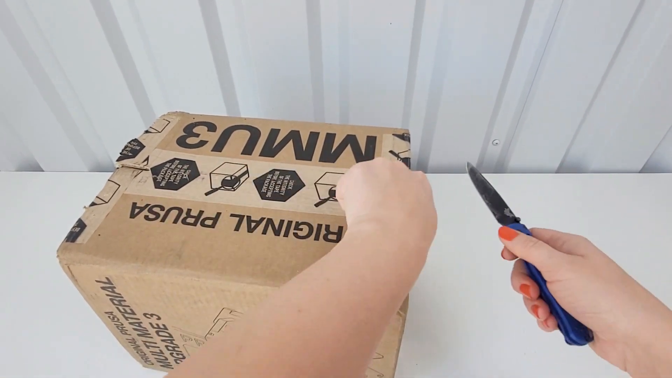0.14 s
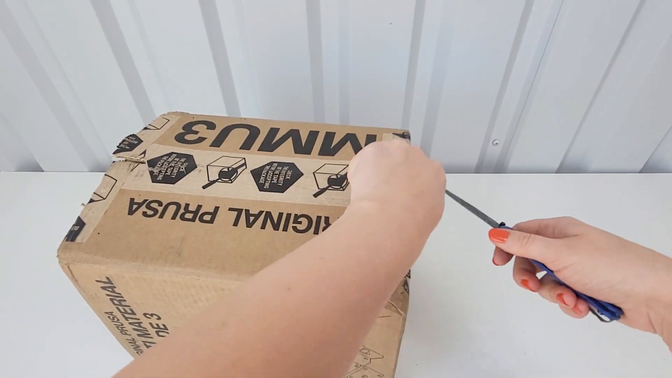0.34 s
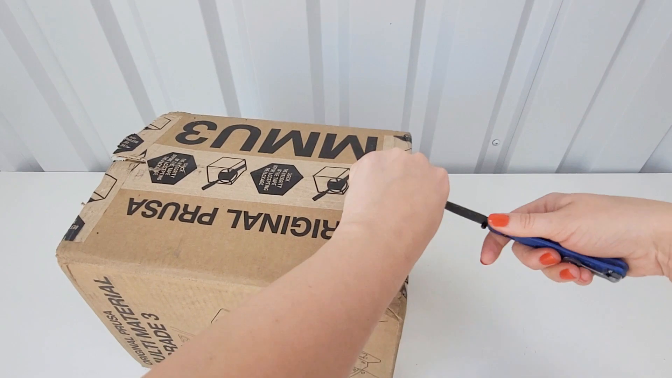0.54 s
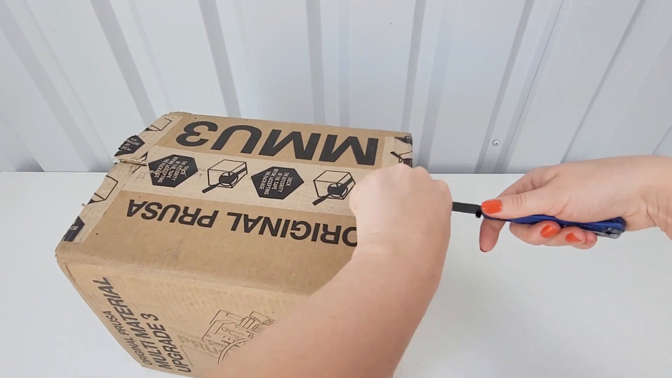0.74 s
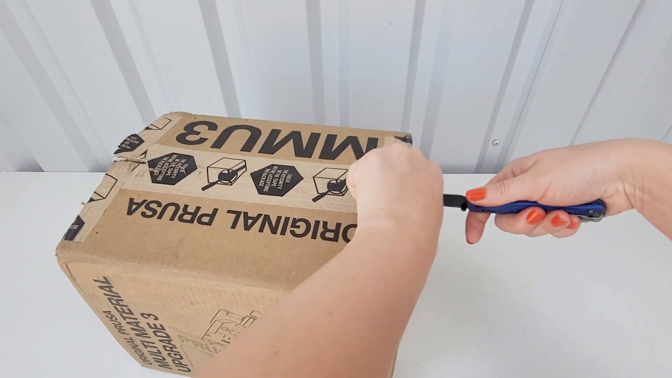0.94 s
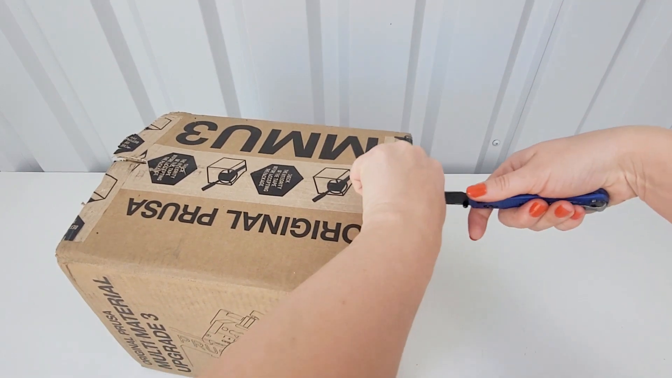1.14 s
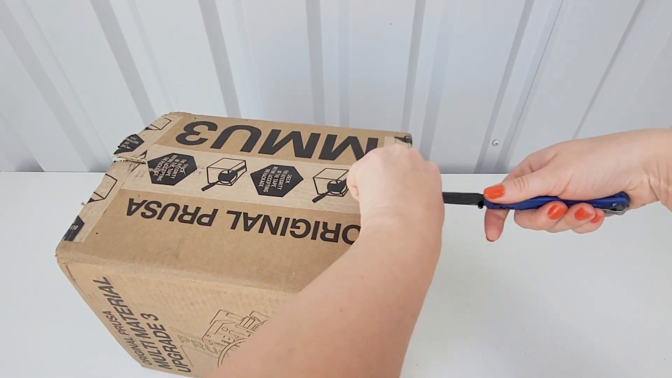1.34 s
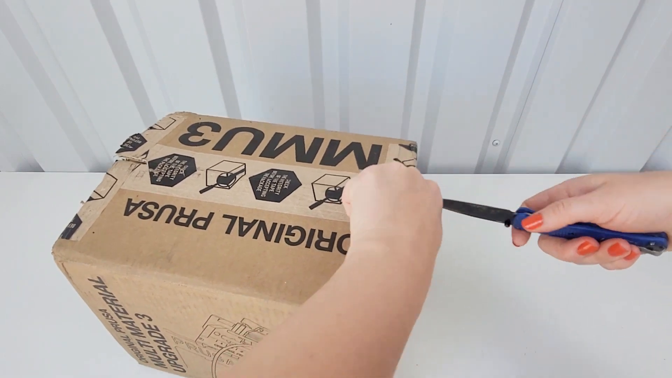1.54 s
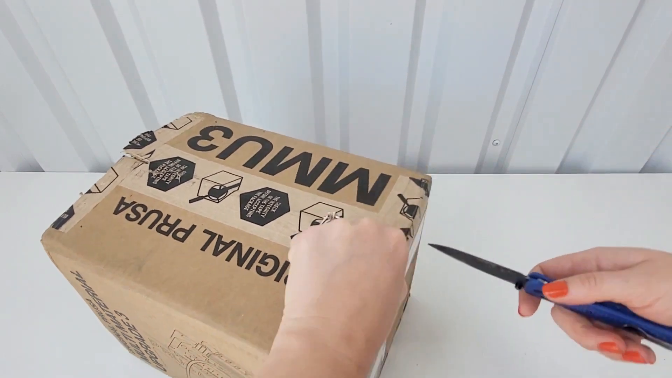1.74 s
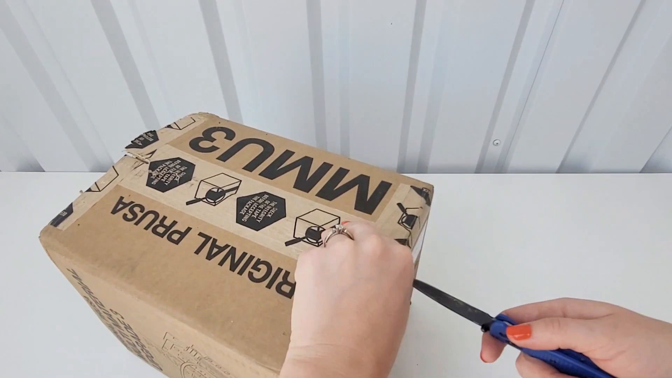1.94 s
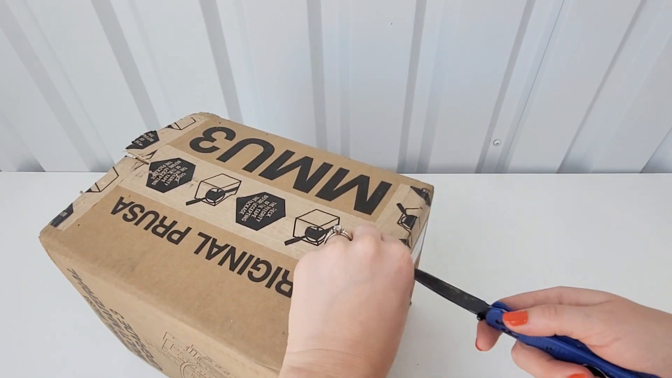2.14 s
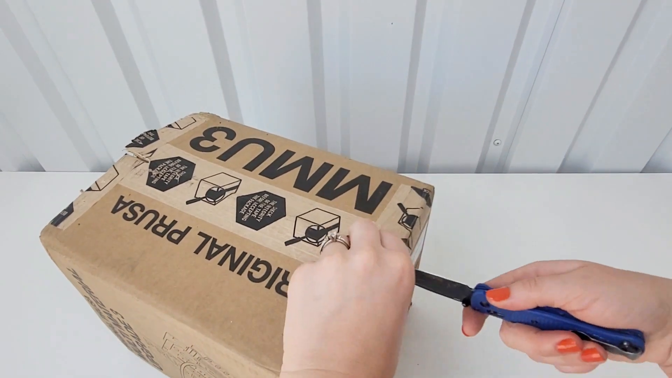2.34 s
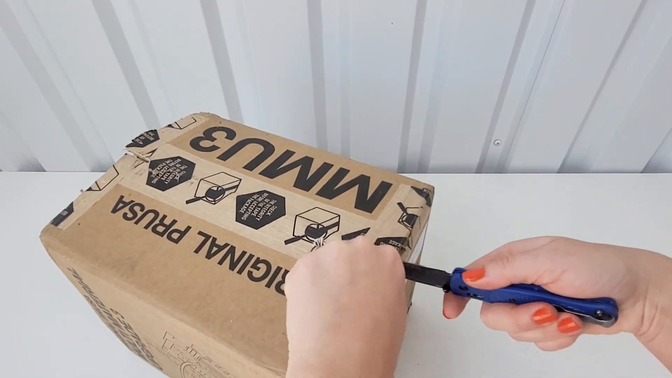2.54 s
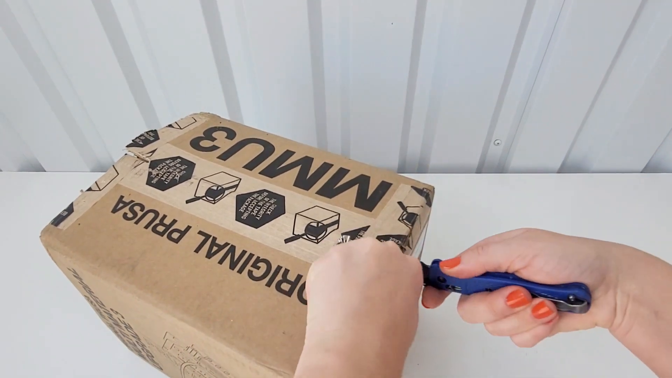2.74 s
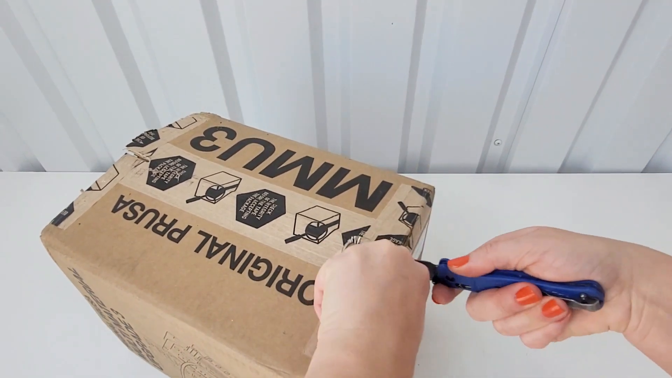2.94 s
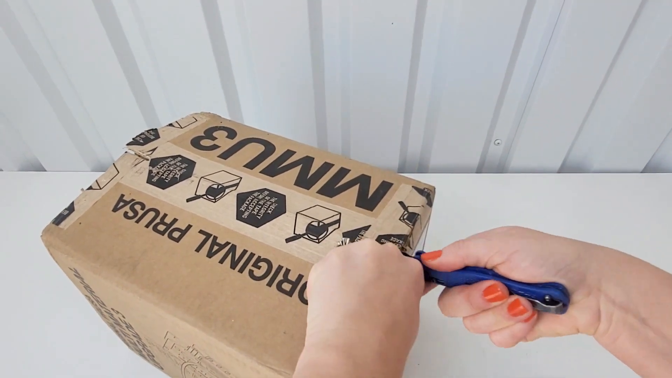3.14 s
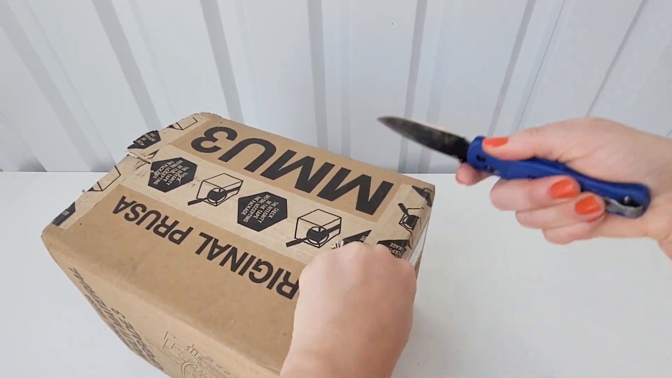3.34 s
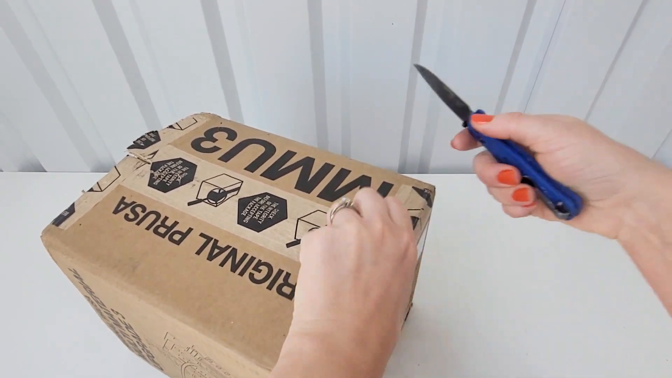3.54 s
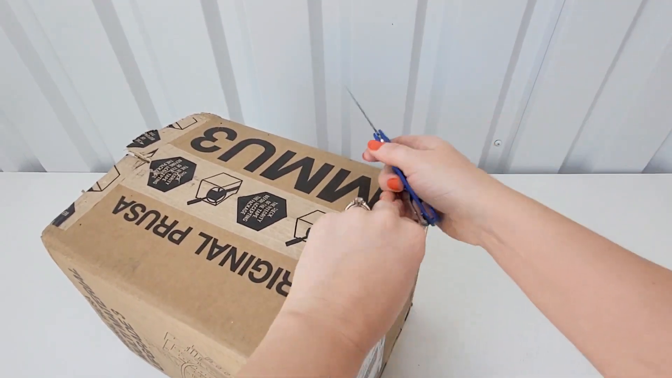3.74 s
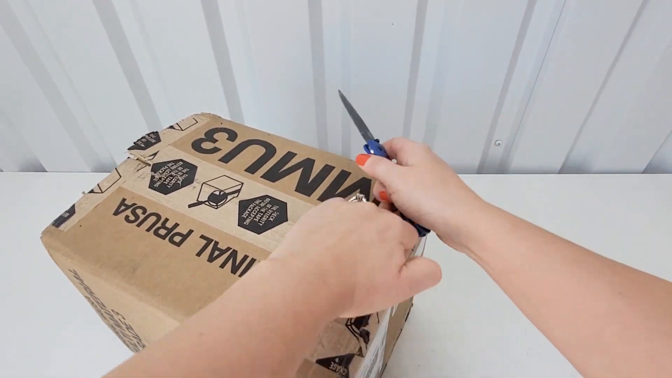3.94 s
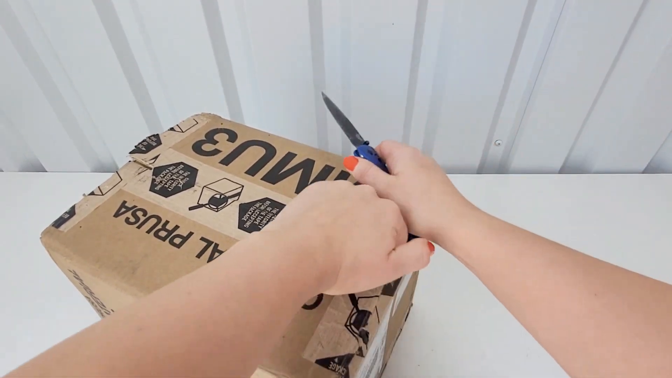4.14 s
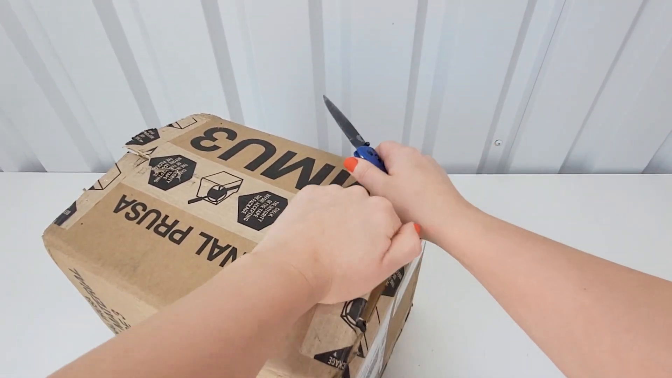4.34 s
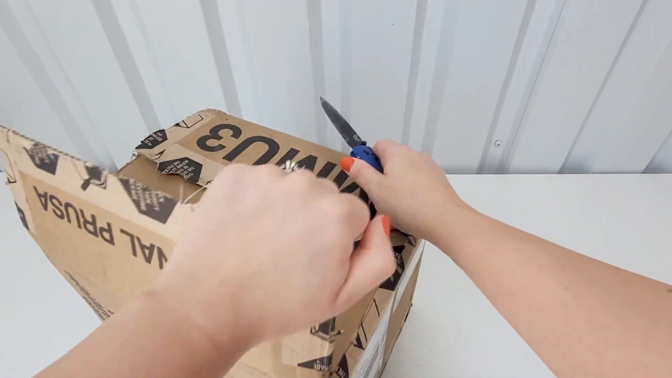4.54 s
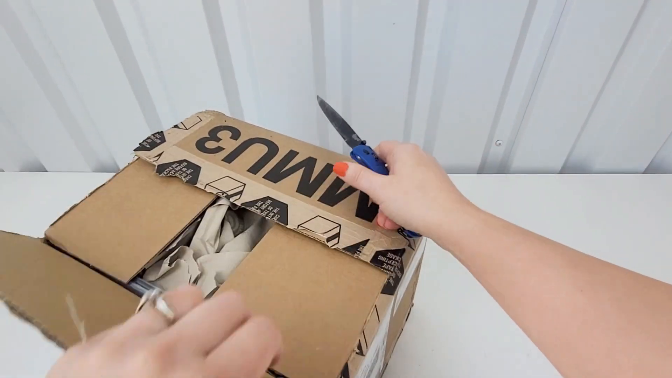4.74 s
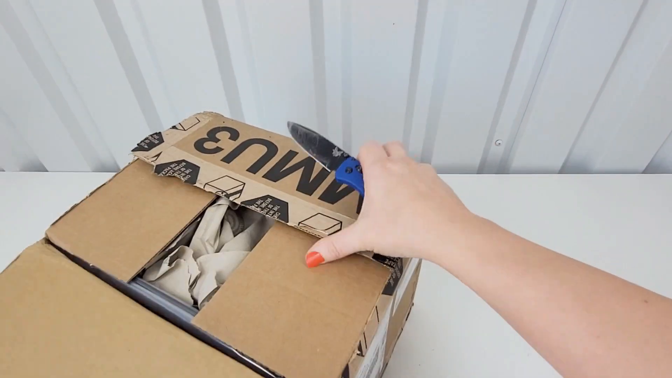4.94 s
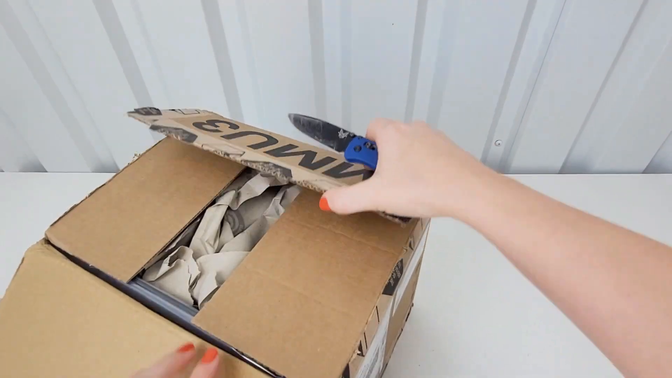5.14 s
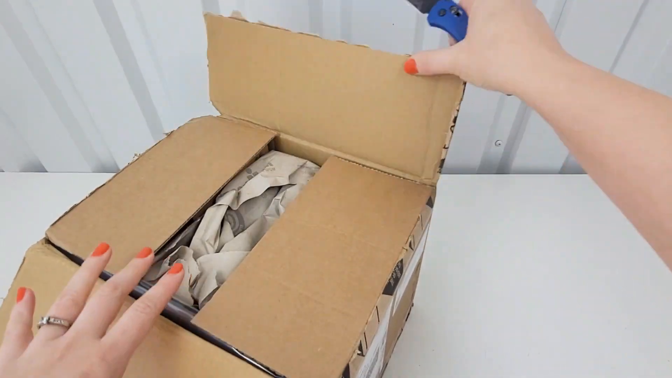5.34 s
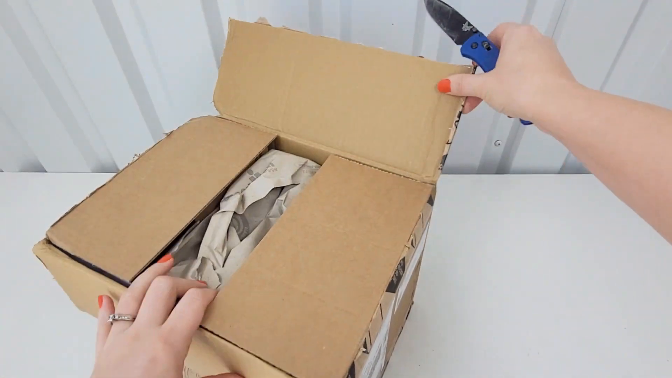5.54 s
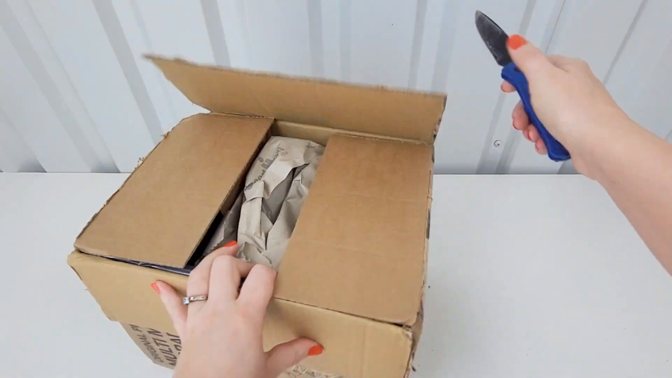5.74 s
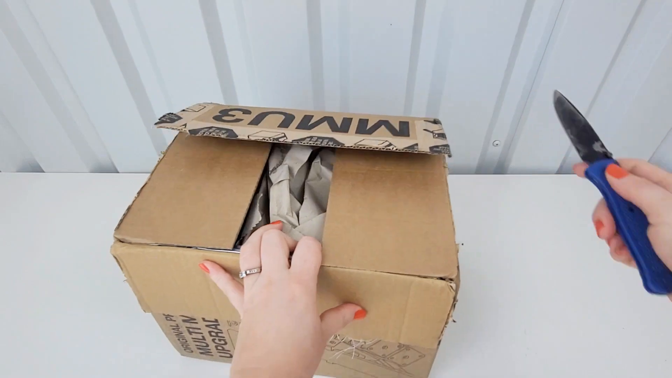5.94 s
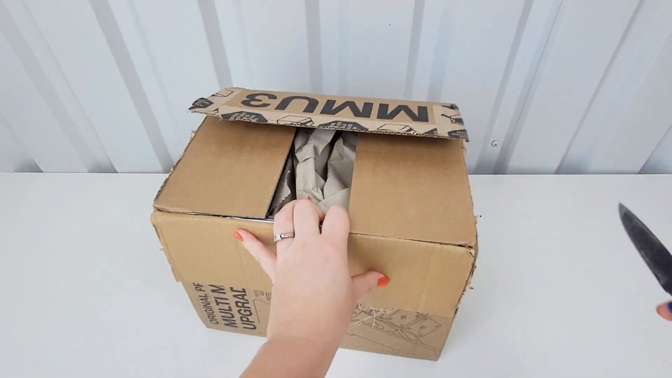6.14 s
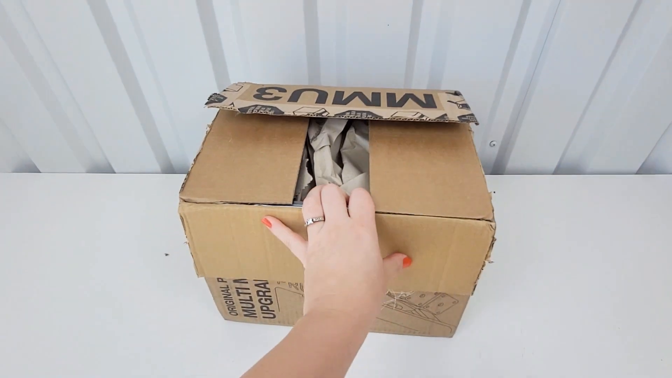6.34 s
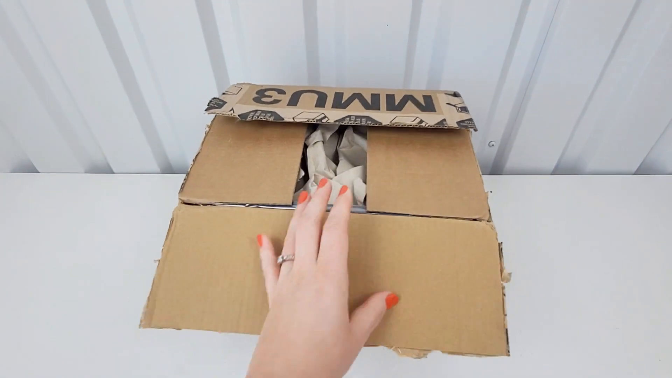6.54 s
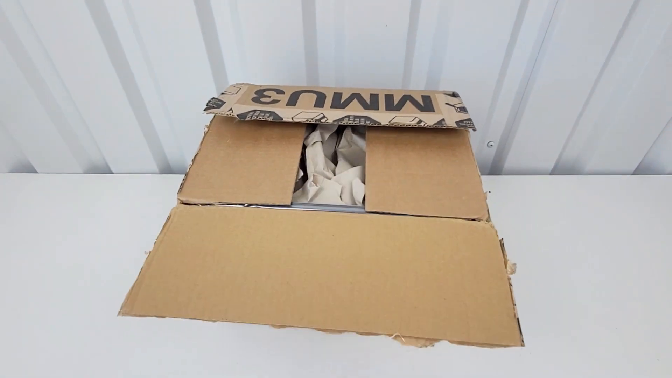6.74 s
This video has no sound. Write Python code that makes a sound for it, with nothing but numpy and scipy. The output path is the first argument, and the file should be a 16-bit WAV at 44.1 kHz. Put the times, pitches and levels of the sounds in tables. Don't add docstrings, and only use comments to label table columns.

```python
import sys
import numpy as np
from scipy import signal
from scipy.fft import rfft, irfft, next_fast_len
from scipy.io import wavfile

SR = 44100
rng = np.random.default_rng(int(sys.argv[2]) if len(sys.argv) > 2 else 0)


def volts_from_db(level):
    exponent = np.asarray(level, float) / 20
    return 10 ** exponent


def pcm_store(signal):
    levels = np.round(np.clip(np.atleast_2d(signal), -1, 1) * 32767)
    wavfile.write(sys.argv[1], SR, levels.astype(np.int16).T)


N = 303395


def rms_one(x):
    return x / np.sqrt(np.mean(x ** 2) + 1e-20)


def in_time(rows):
    t_s, *columns = np.transpose(rows)
    return [np.interp(np.arange(N) / SR, t_s, column) for column in columns]


def band(x, low_hz, high_hz):
    sos = signal.butter(2, [low_hz, min(high_hz, 0.45 * SR)], "band", fs=SR, output="sos")
    return signal.sosfilt(sos, x)


def high_pass(x, order, cut_hz):
    return signal.sosfilt(signal.butter(order, cut_hz, "high", fs=SR, output="sos"), x)


def coloured(x, spectrum, ripple_db=0):
    f_hz, level_db = np.transpose(spectrum)
    size = next_fast_len(N)
    grid_hz = np.fft.rfftfreq(size, 1 / SR) + 1
    ripple = np.interp(grid_hz, np.linspace(0, SR / 2, 160), rng.standard_normal(160))
    gain_db = np.interp(np.log(grid_hz), np.log(f_hz), level_db) + ripple_db * ripple
    return irfft(rfft(x, size) * volts_from_db(gain_db), size)[:N]


def drift(rate_hz):
    r = np.exp(-80 * np.pi * rate_hz / SR)
    slow = signal.lfilter([1], [1, -2 * r, r * r], rng.standard_normal(N // 40 + 2002))[2000:]
    return np.interp(np.arange(N) / 40, np.arange(len(slow)), rms_one(slow))


def ring(push, f_hz, t60_s):
    r = volts_from_db(-60 / (t60_s * SR))
    w = 2 * np.pi * f_hz / SR
    return signal.lfilter([0, np.sin(w)], [1, -2 * r * np.cos(w), r * r], push + 1e-18)


def add(out, t_s, piece):
    i = round(t_s * SR)
    out[i:i + len(piece)] += piece[:N - i]


def swell_db(t, peak_s, rise_s, fall_s, roundness):
    before = (peak_s - t) / max(rise_s, 0.005)
    after = (t - peak_s) / max(fall_s, 0.005)
    away = np.where(t < peak_s, before, after).clip(0)
    return (-20 * away ** roundness).clip(-100)


def resonant_friction(rows, width):
    out = np.zeros(N)
    for peak_s, level_db, rise_s, fall_s, f_hz in rows:
        t = np.arange(max(peak_s - 2 * rise_s, 0), peak_s + 2 * fall_s, 1 / SR)
        swell = volts_from_db(swell_db(t, peak_s, rise_s, fall_s, 1.3))
        heard = swell * band(rng.standard_normal(len(t)), f_hz / (1 + width), f_hz * (1 + width))
        add(out, t[0], volts_from_db(level_db) * np.sqrt(np.mean(swell ** 2)) * rms_one(heard))
    return out


def background():
    # f/Hz, level/dB rms
    motor = [(58.6, -53.5), (119.7, -64), (115.5, -60.5), (174, -57.5), (137.4, -70)]
    # f/Hz, level/dB per Hz
    air = [(30, -11.5), (80, -12.5), (200, -16.5), (260, -18), (500, -40.5), (900, -46), (1300, -56),
           (2500, -81), (4000, -60), (9000, -73), (14300, -66), (16500, -82)]
    # t/s, gain/dB
    duck = [(0, -1), (1.5, 0.8), (3, 1.3), (3.25, 0), (4.2, 0), (4.55, -7), (5.2, -7), (5.7, -3),
            (6.1, 0.5), (6.88, -2.5)]
    t = np.arange(N) / SR
    hum = np.zeros(N)
    for f_hz, level_db in motor:
        level = np.sqrt(2) * volts_from_db(level_db + 1.4 * drift(0.88))
        hum += level * np.sin(2 * np.pi * f_hz * t + 0.42 * drift(0.88))
    hiss = rms_one(coloured(rng.standard_normal(N), air) * volts_from_db(1.2 * drift(4.6)))
    return volts_from_db(in_time(duck)[0]) * (hum + volts_from_db(-61) * hiss)


def jolts():
    # t/s, peak/dB, f/Hz, t60/s
    jolt_rows = [
        (1.868, -44, 98, 0.13),
        (3.002, -36, 93, 0.099),
        (3.165, -15.5, 164, 0.095),
        (3.19, -31, 82.4, 0.17),
        (3.85, -31, 153, 0.12),
        (4.407, -19, 170, 0.12),
        (4.44, -27, 92, 0.13),
    ]
    out, t = np.zeros(N), np.arange(9000) / SR
    for t_s, peak_db, f_hz, t60_s in jolt_rows:
        shape = volts_from_db(-60 * t / t60_s) * (1 - np.exp(-t / 0.002))
        add(out, t_s, volts_from_db(peak_db) * np.sin(2 * np.pi * f_hz * t) * shape)
    return out


def creak():
    # t/s, level/dB, f/Hz
    creak_rows = [
        (6.45, -53, 748),
        (6.48, -56, 756),
        (6.574, -57.5, 770),
        (6.714, -52.5, 776),
        (6.88, -63.5, 780),
    ]
    level_db, f_hz = in_time(creak_rows)
    slips = (rng.random(N) < 1500 / SR) * rng.standard_normal(N)
    sounding = np.arange(N) > creak_rows[0][0] * SR
    mode_hz = f_hz[-N // 40]
    return sounding * volts_from_db(level_db - 3.5) * rms_one(ring(slips, mode_hz, 0.031))


def slide_humps():
    hump_rows = [
        (1.61, -43, 0.17, 0.17, 4100),
        (5.7, -75, 0.26, 0.33, 3000),
        (6.1, -42, .45, 0.26, 1990),
    ]
    return resonant_friction(hump_rows, width=0.56)


def singing():
    sung_rows = [(4.75, -44.5, 0.022, 0.017, 2270), (4.75, -47, .015, .015, 3300),
                 (4.74, -49, .02, .015, 2850), (4.792, -46, 0.012, .02, 1900), (4.87, -51, .03, .02, 1200),
                 (4.81, -46, .015, .04, 450), (4.752, -46, .015, .02, 600),
                 (4.988, -44, 0.021, 0.015, 1770), (4.985, -45, .012, .015, 1130),
                 (4.987, -52, .012, .015, 5350), (5.013, -49, .012, 0.028, 1110),
                 (5.013, -49, .01, 0.017, 2100), (5.056, -46, .01, 0.032, 1320),
                 (4.168, -39.5, .01, .06, 1950), (4.203, -28, 0.0084, 0.011, 1840),
                 (5.385, -61, .02, .02, 3340), (5.26, -51, 0.0089, .015, 1460),
                 (4.235, -39, 0.02, 0.15, 555), (6.57, -56.5, 3.0, 0.069, 13900),
                 (5.15, -58, .07, 0.052, 2200), (5.265, -53, 0.0226, 0.029, 880),
                 (8.1, -48.5, 0.02, .02, 1200), (6.393, -42, .008, 0.022, 1430),
                 (6.41, -40.5, 0.01, 0.017, 1320), (6.443, -44, .01, 0.015, 1300),
                 (6.407, -51, 0.056, .03, 3070)]
    return resonant_friction(sung_rows, width=0.073)


def rasps():
    rasp_rows = [
        (2.33, -67, .15, .15, 4000),
        (2.72, -58, .3, 0.31, 500),
        (2.42, -61.5, 0.05, 0.21, 1210),
        (2.66, -54.5, 0.11, 0.12, 1265),
        (2.68, -56, .1, 0.071, 1950),
        (2.8, -54, 0.096, 0.038, 1830),
        (2.79, -58, 0.089, .05, 1240),
        (2.95, -49, 0.076, 0.046, 1350),
        (2.95, -50, 0.065, .04, 2050),
    ]
    return resonant_friction(rasp_rows, width=0.11)


def thumps():
    # f/Hz, level/dB, t60/s
    modes = [(185, -6, 0.066), (245, -5, 0.069), (284, -3.5, 0.056), (470, 4.5, 0.02), (546, -4, 0.069),
             (718, -6.5, 0.041), (1100, -9, 0.026)]
    # t/s, peak/dB, f/Hz
    wrenches = [(2.975, -28.5, 506), (2.988, -19.5, 365), (2.999, -15, 155), (3.017, -22.5, 246),
                (3.117, -29.5, 172), (3.155, -16.5, 185), (3.166, -14, 245), (3.186, -18, 470),
                (3.205, -24, 240), (3.344, -35, 166), (4.161, -23.5, 245), (4.21, -9.5, 560),
                (4.215, -15, 424), (4.301, -32, 454), (4.376, -10.5, 450), (4.383, -21, 450),
                (4.399, -8, 245), (4.415, -10.5, 286), (4.43, -7, 266), (4.446, -17, 568)]
    # t/s, peak/dB, f/Hz
    knocks = [(3.6, -36.5, 293), (3.613, -35.5, 460), (3.668, -33.5, 458), (3.828, -33, 229),
              (3.841, -30, 173), (3.863, -27, 190), (3.91, -30.5, 202), (3.934, -35.5, 204),
              (4.006, -34.5, 188), (5.049, -21.5, 460), (5.055, -22, 330), (5.051, -32, 664),
              (5.11, -40, 450), (5.591, -30.5, 302)]
    # t/s, peak/dB, f/Hz
    pats = [(.168, -47, 575), (.248, -42, 300), (.548, -49, 306), (.622, -34.5, 350), (.649, -49, 186),
            (1.015, -52, 415), (1.871, -41, 159), (2.046, -39.5, 254), (4.732, -39, 550),
            (4.805, -44, 400.4), (5.014, -41, 454), (5.035, -43, 424), (5.27, -36.5, 447),
            (5.384, -37.5, 302), (5.47, -42, 248), (5.652, -28, 263), (5.657, -29, 410), (5.71, -38, 407),
            (6.404, -53, 308), (6.44, -35, 485), (6.563, -41.5, 400)]
    out, t = np.zeros(N), np.arange(6000) / SR
    # rows, t60/s, rise/s
    for rows, t60_s, rise_s in [(wrenches, 0.034, 0.0013), (knocks, 0.047, 0.0019), (pats, 0.032, 0.0032)]:
        push = t * np.exp(-t / (0.12 * rise_s))
        push = push / push.sum()
        shape = volts_from_db(-60 * t / t60_s) * (1 - np.exp(-t / rise_s))
        for t_s, peak_db, f_hz in rows:
            thump = np.sin(2 * np.pi * f_hz * t) * shape
            for mode_hz, mode_db, mode_t60_s in modes:
                strength, detune = rng.standard_normal(2)
                mode = ring(push, mode_hz * (1 + 0.076 * detune), mode_t60_s)
                thump = thump + volts_from_db(mode_db - 7.5) * strength * mode
            add(out, t_s - 0.002, volts_from_db(peak_db + 4.0) * thump)
    return high_pass(out, 2, 190)


def stroke_levels():
    # peak t/s, scrape level/dB, rise/s, fall/s, brightness/dB per layer
    grips = [(.185, -57.5, 0.063, 0.054, -1), (.25, -60, 0.069, 0.046, -1.5), (.31, -71, 0.056, 0.05, 0),
             (.57, -61.5, 0.1, 0.16, 0.5), (.65, -54, 0.041, 0.039, 1), (.83, -63.5, 0.41, 0.2, -0.5),
             (4.62, -59, 0.038, 0.047, 5), (4.75, -52.5, 0.041, 0.04, 1), (4.84, -56, 0.15, 0.19, 0.5),
             (4.99, -57, 0.058, 0.045, 0), (5.06, -59.5, 0.039, 0.096, -4), (5.15, -59, 0.066, 0.19, 1),
             (5.265, -56, 0.028, 0.037, 0), (5.37, -59, 0.093, 0.14, 2.5), (5.48, -53, 0.052, 0.11, -0.5),
             (6.36, -51.5, 0.025, 0.048, -0.5), (6.408, -44.5, 0.036, 0.049, 2),
             (6.445, -51.5, 0.022, 0.064, 1.5), (6.52, -59, 0.085, 0.057, 2), (6.58, -61, 0.037, 0.054, 2),
             (6.72, -67, 0.42, 0.59, -1)]
    probes = [(.06, -69, 0.12, 0.14, -1.5), (1.22, -71, 0.022, 0.072, 10), (1.35, -65, 0.078, 0.044, 1.5),
              (1.87, -65.5, 0.036, 0.065, -2), (2.0, -63, 0.11, 0.027, 0), (2.07, -61, 0.045, 0.09, 1),
              (2.15, -63, 0.032, 0.069, -1.5), (2.3, -61.5, 0.23, 0.22, 0.5),
              (2.41, -58, 0.035, 0.056, -0.5), (2.48, -58.5, 0.038, 0.083, -1),
              (3.52, -65.5, 0.092, 0.13, 5)]
    cuts = [
        (2.66, -55, 0.11, 0.078, 2),
        (2.8, -55.5, 0.081, 0.078, 1.5),
        (2.95, -50.5, 0.067, 0.066, 1.5),
    ]
    slides = [
        (1.61, -44, 0.2, 0.24, 0.3),
        (5.62, -45, 0.14, 0.24, 1),
        (5.72, -44, .08, 0.098, 2),
        (6.08, -42.5, 0.66, 0.21, 0.5),
        (6.22, -45.5, 0.22, 0.15, -0.5),
    ]
    tears = [(3.01, -42.5, 0.067, 0.14, 1), (3.17, -37.5, 0.077, 0.11, 1), (3.34, -53.5, 0.024, 0.083, 0),
             (3.62, -57.5, 0.026, 0.074, 1.5), (3.67, -47, 0.02, 0.067, 0), (3.74, -49, 0.044, 0.058, 4.5),
             (3.85, -46, 0.1, 0.069, -0.5), (3.92, -42, 0.047, 0.09, 5), (4.0, -55, .04, 0.1, 4),
             (4.165, -44, 0.044, 0.041, 2), (4.215, -40, 0.072, 0.24, 0.5), (4.36, -29.5, 0.024, 0.1, 7.5),
             (4.43, -31, 0.067, 0.13, -2), (4.52, -54, .06, 0.05, -2.5)]
    # rows, level/dB per layer, roundness of the swell
    contacts = [(grips, (4.5, -1, -1.5, -2), 2),
                (probes, (2.5, -11.5, -2, -7), 2.5),
                (cuts, (1, -1.5, -0.5, -4.5), 1.5),
                (slides, (-10.5, -5.5, -3, -4), 2),
                (tears, (4, 2, 0, -5), 0.9)]
    resting_db = np.array([-67.5, -99, -81.5, -89])
    t = np.arange(0, N, 32) / SR
    power = volts_from_db(resting_db)[:, None] ** 2 + 0 * t
    for rows, shares_db, roundness in contacts:
        for peak_s, level_db, rise_s, fall_s, bright_db in rows:
            layers_db = level_db + np.array(shares_db) + bright_db * np.arange(-2, 2)
            power = power + volts_from_db(layers_db[:, None] + swell_db(t, peak_s, rise_s, fall_s, roundness)) ** 2
    return [np.interp(np.arange(N) / SR, t, np.sqrt(p)) for p in power]


def rubbing():
    # f/Hz, level/dB per Hz
    colour = [(150, 1), (400, 1.5), (900, -4.5), (1800, -5), (4500, -13), (7000, -15.5), (10000, -13.5),
              (12500, -15), (14300, -9), (15500, -10), (16500, -28)]
    slips_per_s, spread_db, flutter_db, ripple_db = 12000, 2.2, 0.9, 2.2
    bands_hz = [(170, 1315), (850, 2800), (2450, 7700), (6300, 14700)]
    out, pressure = np.zeros(N), drift(15.0)
    for gain, (low_hz, high_hz) in zip(stroke_levels(), bands_hz):
        sizes = rng.standard_normal(N) * volts_from_db(spread_db * rng.exponential(1, N).clip(0, 4))
        slips = (rng.random(N) < slips_per_s / SR) * sizes
        slips = slips * volts_from_db(flutter_db * (pressure + 1.54 * drift(11.7)))
        place = 1.26 * drift(2.66)
        answer = coloured(slips * np.cos(place) ** 2, colour, ripple_db)
        answer = answer + coloured(slips * np.sin(place) ** 2, colour, ripple_db)
        out += gain * rms_one(band(band(answer, low_hz, high_hz), low_hz, high_hz))
    return out


def rips():
    rip_rows = [(2.976, -32, 0.0032, 0.0066, 3700), (3.016, -36, 0.017, 0.012, 7300),
                (3.153, -31.5, 0.0087, .01, 6500), (3.18, -31, .012, 0.022, 5800),
                (4.167, -30.5, 0.0096, 0.016, 4500), (4.202, -29, .012, 0.012, 2900),
                (4.362, -27.5, .016, .02, 6900), (4.376, -25.5, 0.0075, 0.013, 5900),
                (3.6, -56, .025, .02, 5500), (4.885, -54, 0.029, .03, 4500),
                (5.015, -51.5, .012, 0.014, 3100), (5.068, -50.5, 0.0066, .012, 2300),
                (4.377, -21.5, .007, 0.034, 1140), (4.397, -25, 0.0092, 0.017, 1440),
                (4.432, -22.5, .005, 0.036, 1130), (4.213, -25.5, .007, 0.017, 1300),
                (4.356, -32, .003, 0.022, 1450), (4.346, -30, 0.0023, 0.005, 4200),
                (4.792, -49, .008, .015, 2000), (.252, -55, .006, .012, 2500),
                (2.047, -52, .003, .015, 1500), (4.3, -37, .002, .015, 1900),
                (3.905, -29, .003, .008, 4900), (3.862, -42, 0.012, 0.013, 2000),
                (2.978, -33.5, .004, 0.016, 920)]
    return resonant_friction(rip_rows, width=0.78)


def snaps():
    # t/s, peak/dB, hump f/Hz
    tape_snaps = [(.3086, -51, 14300), (1.1109, -63, 1300), (1.1617, -60, 3700), (1.3413, -52, 6240),
                  (1.947, -54, 1670), (2.0323, -47, 1490), (2.3046, -54, 4100), (2.4603, -48, 4930),
                  (2.4842, -43, 2940), (1.1967, -49, 13300), (1.219, -43.5, 1140), (1.997, -31.5, 13300),
                  (2.046, -33.5, 5370), (2.9745, -16, 3600), (2.9879, -17, 1050), (3.1535, -16.5, 8100),
                  (3.1641, -12.5, 10900), (3.1768, -12, 13600), (3.6192, -36.5, 13800),
                  (3.7196, -26, 13000), (3.8861, -33, 2000), (3.903, -13, 16600), (3.9477, -27, 8150),
                  (4.1075, -41, 3000), (4.3419, -14, 13000), (4.3452, -8, 13700)]
    peel_snaps = [(2.138, -41, 1400), (2.8044, -36, 1730), (3.012, -23, 1330), (3.0182, -20.5, 2360),
                  (3.1156, -25.5, 1240), (3.342, -30, 1130), (3.6057, -40.5, 1370), (3.6673, -19.5, 1000),
                  (3.9276, -25, 4600), (4.1472, -25, 5330), (4.1592, -11, 4600), (4.197, -19, 4700),
                  (4.2078, -7, 1760), (4.246, -30, 5000), (4.3544, -15.5, 1630), (4.3975, -17, 3300),
                  (4.4132, -15, 3900), (4.4516, -24, 2900)]
    card_snaps = [(.6384, -46, 1420), (1.866, -39.5, 4000), (3.1848, -21, 1240), (3.8642, -31, 1180),
                  (4.0063, -32, 1160), (4.2988, -16.5, 1910), (4.3728, -8.5, 1880), (4.376, -4, 1300),
                  (4.397, -11, 1150), (4.414, -13, 1260), (4.4294, -6.5, 1010), (4.7216, -49, 2280),
                  (4.8408, -44, 1780), (4.961, -43, 1800), (5.033, -47, 1100), (5.048, -28.5, 1330),
                  (5.066, -34, 1400), (5.15, -47, 2240), (5.2666, -38, 990), (5.4494, -46, 1080),
                  (6.3554, -37, 1400), (6.391, -41, 1410), (6.408, -34, 1200), (6.439, -36, 1290)]
    # rows, dull/dB, scrape/dB, fine/dB, crackle/dB
    kinds = [(tape_snaps, -14, -12, -5.5, -7), (peel_snaps, -10, -7.5, -4.5, -7),
             (card_snaps, -6.5, -15.5, -11, -5.5)]
    out, t = np.zeros(N), np.arange(2500) / SR
    for rows, dull_db, scrape_db, fine_db, crackle_db in kinds:
        for t_s, peak_db, f_hz in rows:
            a, b, c, d = rng.standard_normal((4, len(t)))
            grain = volts_from_db(4.0 * np.repeat(rng.standard_normal(50), 50))
            crackle = volts_from_db(crackle_db - 60 * t / 0.045) * grain
            shape = (volts_from_db(-60 * t / 0.007) + crackle) * (1 - np.exp(-t / 0.0002))
            hump = 0.77 * rms_one(band(a, f_hz / 1.21, f_hz * 1.12))
            dull = volts_from_db(dull_db) * rms_one(band(b, 880, 1800))
            scrape = volts_from_db(scrape_db) * rms_one(band(c, 2800, 4460))
            fine = volts_from_db(fine_db) * rms_one(band(d, 6700, 16400))
            add(out, t_s - 0.0005, volts_from_db(peak_db - 5.5) * shape * (hump + dull + scrape + fine))
    return out


def room(x):
    t60_s, wall_cut_hz = 0.2, 7100
    out, dull = np.zeros(N), np.exp(-2 * np.pi * wall_cut_hz / SR)
    for k, lag in enumerate((rng.uniform(0.008, 0.03, 8) * SR).astype(int)):
        loop, gain, state = x.copy(), volts_from_db(-60 * lag / SR / t60_s), [0.]
        for i in range(lag, N, lag):
            back, state = signal.lfilter([gain * (1 - dull)], [1, -dull], loop[i - lag:i], zi=state)
            loop[i:i + lag] += back[:N - i]
        out += (loop - x) * (-1) ** k
    return out


def scene():
    knocks, cracks = thumps(), snaps()
    near = jolts() + creak() + slide_humps() + singing() + rasps() + knocks + rubbing() + rips() + cracks
    echoes = volts_from_db(-16) * room(cracks + 1.05 * knocks)
    return (near + echoes + background())[None]


def roll_off(x):
    return signal.sosfilt(signal.butter(12, 16810, fs=SR, output="sos"), x)


def record(dry):
    heard = high_pass(dry + 0.2 * band(dry, 13300, 13400), 6, 45)
    limited = 0.56 * np.tanh(heard / 0.56)
    wide = signal.sosfilt(signal.cheby2(12, 45, 16950, fs=SR, output="sos"), limited)
    narrow = signal.sosfiltfilt(signal.cheby2(18, 30, 16050, fs=SR, output="sos"), wide)
    return roll_off(narrow + volts_from_db(-26) * (wide - narrow))


dry = scene()
out = record(dry)
pcm_store(out)
```